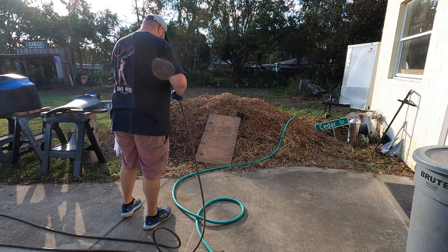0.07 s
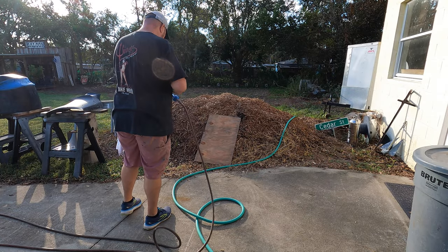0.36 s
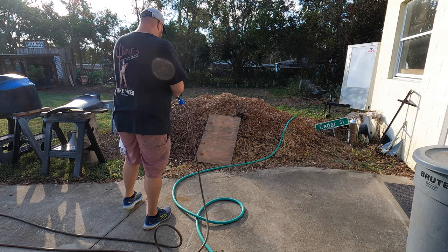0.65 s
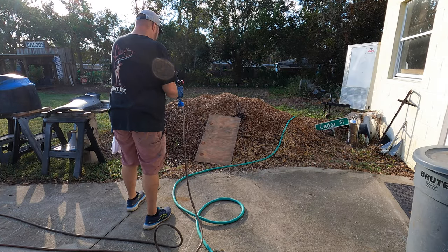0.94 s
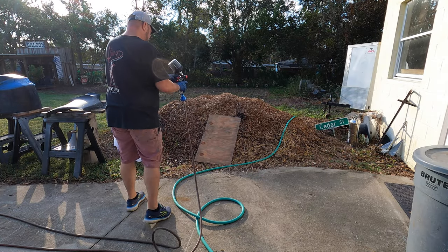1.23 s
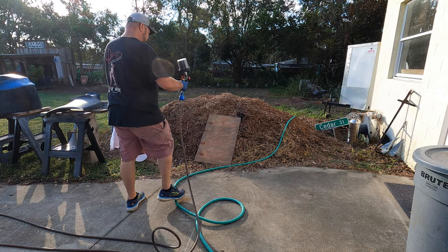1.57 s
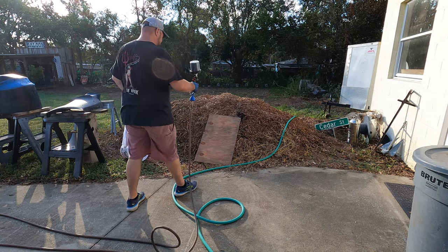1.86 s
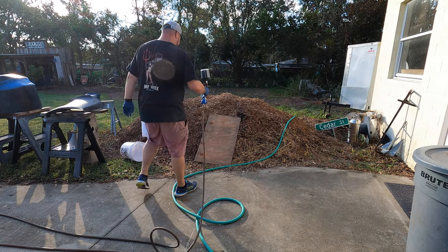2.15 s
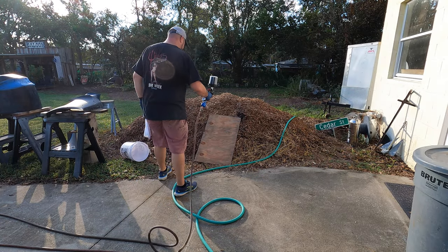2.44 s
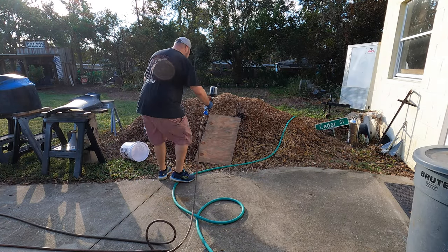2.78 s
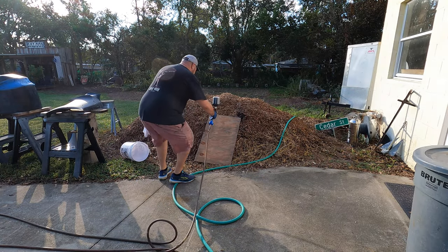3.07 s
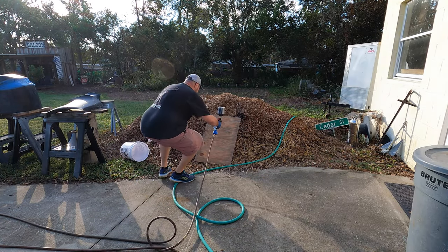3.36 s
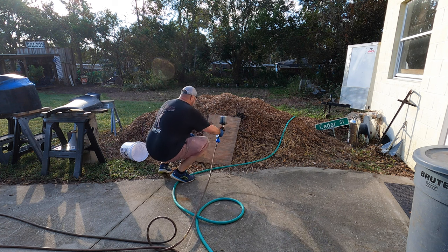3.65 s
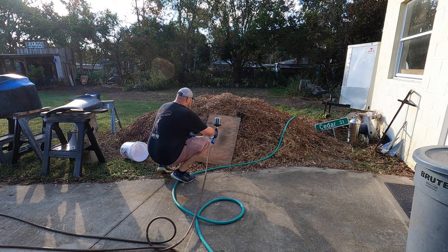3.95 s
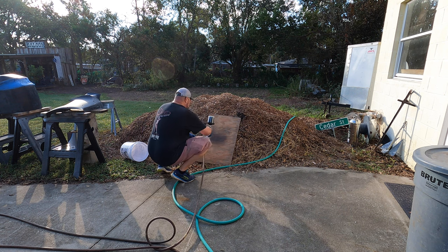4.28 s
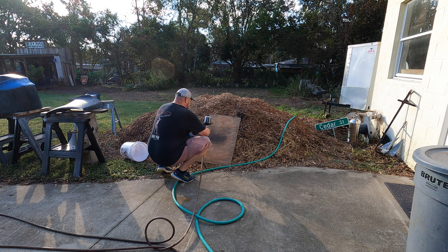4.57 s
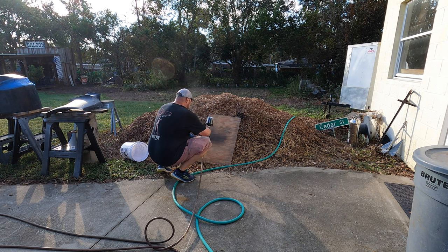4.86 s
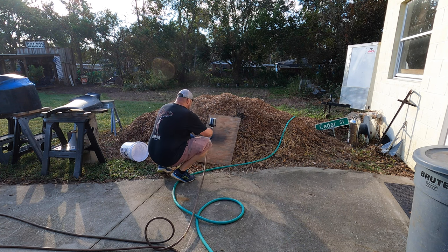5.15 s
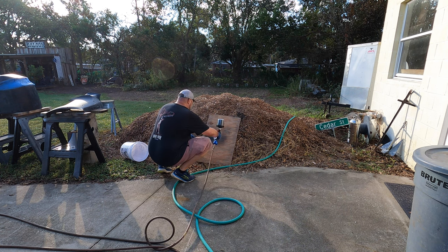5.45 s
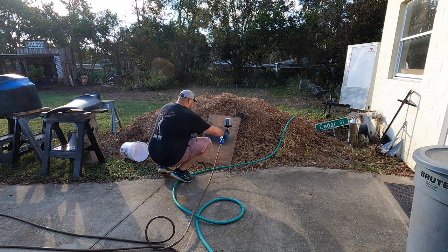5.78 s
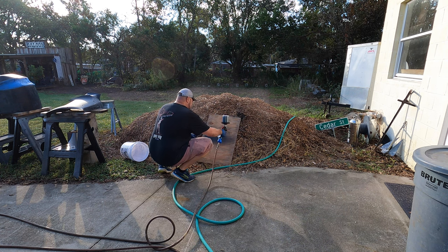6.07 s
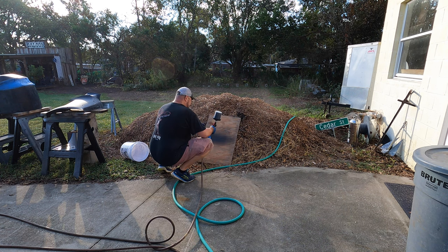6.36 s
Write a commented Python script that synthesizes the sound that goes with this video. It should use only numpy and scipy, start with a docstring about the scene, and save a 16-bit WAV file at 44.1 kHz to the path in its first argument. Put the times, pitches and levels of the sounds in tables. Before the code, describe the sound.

A compressed-air paint gun sprays two long hissing bursts outdoors after a few scuffing footsteps, over a low compressor hum.

```python
"""A back yard, on a stereo pair close to a man with a compressed-air paint gun.
A compressor hums underneath and air leaks faintly from the gun. There are scuffs, ticks and hollow knocks
as he steps from a concrete patio onto dry leaves and crouches. He fires twice at a board: each pull starts
as bright dry air with a kick, then dulls as paint flows and turns hollow as the nozzle nears the board.
The first paint comes with a short crack and splutter. At the end the leak plays faintly on the board."""
import sys
import numpy as np
from scipy import signal
from scipy.fft import rfft, irfft, next_fast_len
from scipy.io import wavfile

SR = 44100
rng = np.random.default_rng(int(sys.argv[2]) if len(sys.argv) > 2 else 0)


def wrap_up_sound(samples):
    """Save the sound to the file named by the first command line argument, as 16-bit audio."""
    columns = np.atleast_2d(samples).T
    # keep every value between -1 and 1, then stretch to whole-number steps
    tamed = np.clip(columns, -1, 1)
    steps = np.round(tamed * 32767).astype(np.int16)
    wavfile.write(sys.argv[1], SR, steps)


N = 287523
T = np.arange(N) / SR
CUTOFF_HZ = 15400

# trigger pulls: air_open_s, air_shut_s, paint_half_open_s, paint_ramp_s, primed_paint_share
PULLS = [(3.039, 4.444, 3.777, 0.097, .08), (4.7552, 5.936, 4.83, 0.014, 0.03)]
# the bed of the yard: time_s, rumble_db, wash_db, leak_db
YARD_LEVEL = [(0, -45, -50.5, -58), (1.7, -42, -52.5, -63.5), (2.7, -42, -49, -64),
              (3.2, -44.5, -59, -65.5), (5.3, -47, -54.5, -69), (6.52, -43, -56, -67.5)]


def from_db(db):
    """Decibels to gain."""
    return 10 ** (np.asarray(db) / 20)


def rms_one(x):
    """Scale to rms 1."""
    return x / np.sqrt(np.mean(x ** 2) + 1e-20)


def bell(x, centre, width):
    """A Gaussian of height 1; width is its standard deviation."""
    return np.exp(-((x - centre) / width) ** 2 / 2)


def in_time(rows):
    """Each column of a curve table at every sample."""
    time_s, *columns = np.transpose(rows)
    return [np.interp(T, time_s, column) for column in columns]


def over_bins(points, size):
    """A table of freq_hz, value on the bins of an FFT, joined on a log axis."""
    hz, value = np.transpose(points)
    return np.interp(np.log(np.arange(size // 2 + 1) * SR / size + 1e-3), np.log(hz), value)


def coloured(x, spectrum):
    """Equalise by a table of freq_hz, gain_db."""
    size = next_fast_len(2 * (x.shape[-1] // 2 + 1), True)
    return irfft(rfft(x, size) * from_db(over_bins(spectrum, size)), size)[..., :x.shape[-1]]


def air_noise(spectrum, likeness):
    """Stereo noise of a given colour and left-right likeness; rms 1."""
    size = next_fast_len(N, True)
    mid, side = rfft(rng.standard_normal((2, size)))
    alike = np.clip(over_bins(likeness, size), -1, 1)
    pair = np.sqrt(1 + alike) * mid + np.sqrt(1 - alike) * side * [[1], [-1]]
    return rms_one(irfft(pair * from_db(over_bins(spectrum, size)), size)[:, :N])


def drift(rate_hz, hop=40):
    """A slow random wander with rms about 1."""
    pole = np.exp(-2 * np.pi * hop * rate_hz / SR)
    slow = signal.lfilter([1], [1, -2 * pole, pole * pole], rng.standard_normal(N // hop + 2002))[2000:]
    return np.interp(np.arange(N) / hop, np.arange(len(slow)), rms_one(slow))


def low_pass(x, hz, order):
    """Butterworth low-pass."""
    return signal.sosfilt(signal.butter(order, hz, fs=SR, output="sos"), x)


def broad_band(x, hz, spread):
    """A band with gentle skirts about a centre."""
    edges_hz = [hz / spread, min(hz * spread, CUTOFF_HZ)]
    return signal.sosfilt(signal.butter(1, edges_hz, "band", fs=SR, output="sos"), x)


def resonance(x, hz, width_hz):
    """Two-pole band-pass with gain 1 on top."""
    r = np.exp(-np.pi * width_hz / SR)
    feedback = [1, -2 * r * np.cos(2 * np.pi * hz / SR), r * r]
    return signal.lfilter(np.array([1, 0, -1]) * (1 - r * r) / 2, feedback, x)


def compressor(buzz_db=-3, throb_trim_db=-2.5, fading_db=-50, fading_hz=2.7):
    """Motor hum and pump throb at unrelated speeds, each partial wavering by itself."""
    speed = [(0, 74.95, 95.78), (4, 73.94, 94.5), (6.52, 74.1, 94.02)]  # sags as the tank fills: time_s, motor_hz, pump_hz
    throb = [(0.0, -46), (0.11, -34.5), (0.51, -40.5), (1.03, -30.5), (1.92, -37), (2.07, -58),
             (2.34, -31.5), (2.52, -51), (2.61, -33.5), (2.83, -59), (2.89, -36), (3.1, -61), (3.3, -32),
             (3.47, -63), (3.79, -44), (5.7, -48.5), (5.94, -38), (6.52, -39)]  # pump fundamental before its trim: time_s, level_db
    hum = [(0, -49), (1.05, -47.5), (2.9, -59.5), (5.3, -57), (6.52, -49.5)]  # motor hum: time_s, level_db
    motor_orders = [(.5, -3), (1, 0.5), (1.75, 2.5), (3, -4), (4, -1.2), (6, -15.5), (7, -17.5), (8, -11.5),
                    (9, -17.5), (10, -23.5), (11, -34), (12, -26.5), (13, -22.5)]  # partials against the hum level: multiple, gain_db
    pump_orders = [(.5, -58.5), (2, -62), (2.75, -65), (4, -62.5), (7, -68)]  # other pump partials: multiple, level_db
    motor_turns, pump_turns = np.cumsum(in_time(speed), axis=1) / SR
    (throb_db,), (hum_db,) = in_time(throb), in_time(hum)
    rumble_db = in_time(YARD_LEVEL)[0]

    def partial(turns, level_db, wobble_rad, waver_db=1.5):
        phase = 2 * np.pi * (turns + rng.random()) + wobble_rad * drift(4.8)
        return np.sqrt(2) * from_db(level_db + waver_db * drift(1.5)) * np.sin(phase)

    motor = sum(partial(k * motor_turns, hum_db + db, wobble_rad=0.2) for k, db in motor_orders)
    motor += partial(2 * motor_turns, rumble_db + buzz_db, wobble_rad=0.52)  # follows the rumble
    pump = sum(partial(k * pump_turns, db, wobble_rad=0.11) for k, db in pump_orders)
    pump += partial(pump_turns, throb_db + throb_trim_db, wobble_rad=0.26, waver_db=2.5)
    # an unsteady part beats against the throb
    angle = 2 * np.pi * pump_turns
    fading = drift(fading_hz) * np.cos(angle) + drift(fading_hz) * np.sin(angle)
    return motor + pump + from_db(fading_db) * fading


def background():
    """Machine rumble, the distant wash of the neighbourhood and air leaking from the gun."""
    # the colour of each noise: freq_hz, gain_db
    rumble = [(15, -37), (30, -9.5), (60, 2), (125, -2), (190, -3), (270, -9.5), (340, -15.5), (450, -30),
              (800, -66)]
    wash = [(200, -1.5), (380, 5), (500, -4.5), (660, 1.5), (850, -6.5), (1250, -8.5), (1800, -13.5),
            (2700, -20), (4000, -31), (9000, -51)]
    leak = [(1500, -2.5), (3600, -6.5), (5200, -0.1), (7200, 0.5), (8300, -6.5), (11000, -6), (12500, -9.5),
            (14000, -17), (15500, -34)]
    likeness = [(100, 0.99), (200, 0.95), (450, 0.55), (1000, 0.33), (3000, 0.41), (10000, 0.48)]  # left against right: freq_hz, correlation
    layers = zip(in_time(YARD_LEVEL), (rumble, wash, leak))
    return sum(from_db(db) * air_noise(spectrum, likeness) for db, spectrum in layers)


def scuffs(grains_per_s=1200, grain_db=4.0, rub=0.37, spread=1.54, top_hz=7000):
    """Dense grains crunch over the smooth rub of each scuff; the last is a splutter as the paint starts."""
    strokes = [(0.096, 0.067, -52, 4100), (.55, 0.61, -78, 2500), (0.757, 0.012, -60, 3000),
               (0.834, 0.022, -66, 2300), (1.066, 0.024, -62, 4500), (1.395, 0.023, -59, 4000),
               (1.86, 0.015, -49.5, 900), (2.065, 0.056, -59, 2260), (2.465, 0.027, -54, 1670),
               (2.588, 0.04, -54, 800), (2.635, 0.011, -44.5, 1840), (2.668, 0.015, -48.5, 2600),
               (2.846, 0.0091, -53, 1270), (2.94, 0.12, -59, 1240), (3.745, 0.0072, -38, 1640)]  # middle_s, half_length_s, level_db, centre_hz
    sizes = from_db(grain_db * np.minimum(rng.exponential(1, N), 4)) * rng.standard_normal(N)
    grains = sizes * (rng.random(N) < grains_per_s / SR)
    grit = low_pass(grains + rub * rng.standard_normal(N), top_hz, order=3)
    return sum(from_db(db) * bell(T, middle_s, half_s) * rms_one(broad_band(grit, hz, spread))
               for middle_s, half_s, db, hz in strokes)


def struck(blows, modes, crack_db, crack_s=0.0029, crack_hz=7000):
    """Each blow is a short crack and sets the object's modes ringing."""
    out, age = np.zeros(N + SR), T[:SR // 4]
    ring = sum((-1) ** k * from_db(db - 60 * age / t60_s) * np.sin(2 * np.pi * hz * age)
               for k, (hz, db, t60_s) in enumerate(modes))
    for start_s, level_db in blows:
        crack = from_db(crack_db) * np.exp(-age / crack_s) * rng.standard_normal(len(age))
        blow = ring + low_pass(crack, crack_hz, order=2)
        at = round(start_s * SR)
        out[at:at + len(age)] += from_db(level_db) * blow / np.abs(blow).max()
    return out[:N]


def gun_clicks():
    """The gun clicks in his hands."""
    clicks = [(.7355, -35), (.7392, -33.5), (.8165, -46)]  # start_s, level_db
    modes = [(2305, 0, 0.039), (2600, 0, 0.023), (3630, -1, 0.036), (4000, -5, .03)]  # the gun's short ring: pitch_hz, gain_db, t60_s
    return struck(clicks, modes, crack_db=5)


def ticks(rattle_s=0.0011, rattle_db=-24, spread=2.17, ring_db=1, ring_width_hz=420):
    """Each tick is one dry snap and a short rattle, in a broad band that rings briefly at its centre."""
    snaps = [(1.3975, -31, 3400), (2.1065, -36, 4200), (2.1462, -31.5, 4400), (2.332, -41, 1900),
             (2.4655, -37, 4200), (2.6115, -39, 3000), (2.6285, -28, 3300), (2.6365, -30, 3800),
             (2.6555, -33, 4000), (2.6618, -24, 2300), (2.808, -39, 2500), (2.831, -34.5, 1600)]  # grit and twigs: start_s, level_db, centre_hz
    out, age = np.zeros(N), T[:SR // 12]
    for start_s, level_db, hz in snaps:
        rattle = from_db(rattle_db) * np.exp(-age / rattle_s) * rng.standard_normal(len(age))
        snap = (age == 0) + rattle
        tick = broad_band(broad_band(snap, hz, spread), hz, spread)
        tick += from_db(ring_db) * resonance(tick, hz, ring_width_hz)
        at = round(start_s * SR)
        out[at:at + len(age)] += from_db(level_db) * tick / np.abs(tick).max()
    return out


def knocks():
    """Two hollow knocks, and later a short crack and splutter as the paint starts."""
    blows = [(1.8487, -31), (1.8644, -38), (3.6305, -29.5), (3.7485, -23.5)]  # start_s, level_db
    modes = [(760, -15, 0.021), (1060, -4, 0.022), (1370, -6, 0.03), (1670, 0, 0.02), (1900, -1, 0.02)]  # the hollow ring: pitch_hz, gain_db, t60_s
    return struck(blows, modes, crack_db=-1.0)


def hollow_rub(at_s=2.6, half_s=0.073, hz=440, width_hz=60, level_db=-50):
    """A brief hollow note goes with the step off the patio."""
    note = resonance(resonance(rng.standard_normal(N), hz, width_hz), hz, width_hz)
    return from_db(level_db) * np.exp(-((T - at_s) / half_s) ** 2) * rms_one(note)


def valve(open_s=0.0019, shut_s=0.0052, kick_s=0.027, kick_db=6):
    """The air valve snaps open, dumps the pressure stored in the hose and closes a little more slowly."""
    flow = np.zeros(N)
    for start_s, stop_s, *_ in PULLS:
        opening = (1 + np.tanh((T - start_s) / (2 * open_s))) / 2
        closing = (1 - np.tanh((T - stop_s) / (2 * shut_s))) / 2
        kick = np.exp(-(np.maximum(T - start_s, 0) / kick_s) ** 2)
        flow += opening * closing * from_db(kick_db * kick)
    return flow


def paint_flow(clear_s=0.035, full_share=0.96):
    """Paint share, 0-1: what sits in the nozzle spits out, then the trigger's second stage feeds more."""
    share = np.zeros(N)
    for start_s, _, paint_s, ramp_s, primed in PULLS:
        needle = (1 + np.tanh((T - paint_s) / ramp_s)) / 2
        spit = primed * np.exp(-np.maximum(T - start_s, 0) / clear_s)
        share = np.where(T >= start_s, spit + full_share * needle, share)
    return np.clip(share, 0, 1)


def gap_tone(hz, width_hz, side_db=-17):
    """Turbulence rings in the gap between nozzle and board, in a broad band centred on the curve hz."""
    size = next_fast_len(N)
    offset_hz = np.fft.fftfreq(size, 1 / SR)
    turbulence = rfft(rng.standard_normal((2, 2 * size)))[:, :size]
    flutter = np.fft.ifft(turbulence / (1 + (offset_hz / width_hz) ** 2))[:, :N]
    carrier = np.exp(2j * np.pi * np.cumsum(hz) / SR)
    mid, side = rms_one(np.real(flutter * carrier))
    return mid + from_db(side_db) * side * [[1], [-1]]


def board_echo(x):
    """A mostly inverted echo off the board slides as the gun travels, combing the jet."""
    path = [(3.9, 0.58, -0.0046), (4.3, 0.47, -0.052), (4.8, 0.7, -0.044), (5.5, 0.78, -0.0071),
            (5.75, 0.806, -0.16), (5.93, .85, 0.0059)]  # the reflection: time_s, lag_ms, strength
    lag_ms, strength = in_time(path)
    late = np.array([np.interp(T - lag_ms / 1000, T, channel) for channel in x])
    return (x + strength * late) / np.sqrt(1 + strength ** 2)


def hollowed(x, width_hz=200):
    """A reflection off arm and paint cup thins one band of the jet, which sways with his hand."""
    notch = [(3.7, 6000, -0.5), (4.0, 5980, 2), (4.44, 5860, 1), (4.9, 4650, 1), (5.2, 4080, 4),
             (5.55, 4090, 0.5), (5.9, 3830, 0)]  # time_s, centre_hz, depth_db
    time_s, centre_hz, depth_db = np.transpose(notch)
    bin_hz, frame_s, frames = signal.stft(x, SR, nperseg=512)
    band = bell(bin_hz[:, None], np.interp(frame_s, time_s, centre_hz), width_hz)
    dip_db = np.interp(frame_s, time_s, depth_db) * band
    return signal.istft(frames * from_db(-dip_db), SR)[1][:, :N]


def spray(roar_db=-13, roar_range_db=25.5, ring_db=-13.5, ring_range_db=12):
    """A turbulent jet, dulled by paint; the board's roar and the gap's ring grow as the nozzle nears."""
    jet_level = [
        [(3.1, -25.5), (3.356, -25.5), (4.42, -31.5)],
        [(4.82, -30.5), (5.214, -32.5), (5.742, -29), (5.92, -31)],
    ]  # one table a pull: time_s, level_db
    aim = [(3.04, 0.14, 3697, 4650, 5230, 6700), (3.6, 0.69, 3555, 4500, 5310, 6550),
           (3.9, 0.64, 3142, 3850, 5460, 6650), (4.3, 0.83, 3200, 4100, 5270, 7040),
           (4.76, 0.25, 3397, 4000, 5310, 6560), (4.9, 0.82, 3422, 4050, 5350, 6560),
           (5.25, 0.92, 3590, 4700, 5580, 6350), (5.53, 0.74, 3520, 4690, 5200, 6780),
           (5.72, 0.78, 3340, 4400, 5344, 6720), (5.93, 0.53, 3030, 4320, 5290, 6750)]  # nozzle to board: time_s, nearness (0-1), resonance_hz for four gap resonances
    gap_tones = [(0.5, 200), (-2, 270), (3, 240), (0.5, 500)]  # those resonances: gain_db, width_hz
    # the gap rings out as the gun sweeps across: middle_s, half_length_s, gain_db for each resonance
    sweeps = [(4.2, 0.18, 1, 3, 4.5, 7), (5.55, 0.073, 7.1, 4, -5, -7), (5.77, 0.072, 6.7, 7, 6.5, 4)]
    # colours of dry air, paint-laden air and its roar on the board: freq_hz, gain_db
    dry_jet = [(300, -22), (700, -23), (1200, -14.5), (2400, -9.5), (3300, -6), (5300, -1.5), (6900, 1.5),
               (8000, -3.5), (8600, -3.5), (10800, -3.7), (12200, -8), (14000, -16), (15500, -31)]
    wet_jet = [(500, -22.5), (1200, -10), (1800, -6), (2600, -4), (3700, 0.5), (4350, -1), (6000, 1),
               (7000, 2), (8150, -4.5), (9300, -6), (10500, -4), (11400, -9), (12200, -10.5),
               (14000, -17.5), (15500, -58)]
    impact_roar = [(250, -31), (520, -12.5), (900, 1.5), (1200, -3), (2000, -11), (5000, -38)]
    likeness = [(300, 0.21), (1200, 0.95), (3000, 0.88), (12000, 0.53)]  # left against right: freq_hz, correlation
    level_db, = in_time(np.vstack(jet_level))
    nearness, *gap_hz = in_time(aim)
    paint = paint_flow()
    swell_db = sum(np.outer(gains_db, bell(T, at_s, half_s)) for at_s, half_s, *gains_db in sweeps)
    tone_db, widths_hz = np.transpose(gap_tones)
    rings = from_db(ring_db - ring_range_db * (1 - nearness) + swell_db + tone_db[:, None])
    jet = np.sqrt(1 - paint) * air_noise(dry_jet, likeness)
    jet += np.sqrt(paint) * air_noise(wet_jet, likeness)
    jet += paint * from_db(roar_db - roar_range_db * (1 - nearness)) * air_noise(impact_roar, likeness)
    jet += sum(ring * gap_tone(hz, width_hz) for ring, hz, width_hz in zip(rings, gap_hz, widths_hz))
    # the resonances share out the jet's power without adding to it
    jet /= np.sqrt(1 + np.sum(rings ** 2, axis=0))
    return scattered(hollowed(board_echo(jet))) * valve() * from_db(level_db)


def trigger_stop():
    """On the second pull the trigger hits its stop and the metal of the gun rings."""
    hit = [(4.7598, -17.5)]  # start_s, level_db
    modes = [(6560, 2, 0.19), (10300, -9, .25), (11800, -2, .25)]  # the metal: pitch_hz, gain_db, t60_s
    return struck(hit, modes, crack_db=19, crack_s=0.00028)


def leak_on_board(swell_s=0.3):
    """With the trigger let go, the leak swells into a faint hollow hiss against the board."""
    tones = [(1375, 210, -71), (4660, 520, -74)]  # bands of the hiss: centre_hz, width_hz, level_db
    swell = np.clip((T - PULLS[-1][1]) / swell_s, 0, 1)
    return swell * sum(from_db(db) * gap_tone(np.full(N, hz), width_hz) for hz, width_hz, db in tones)


def scattered(x, scatter_db=-14, first_s=0.00443, t60_s=0.05):
    """Ground, body and leaf pile return many weak early echoes that finely ripple the spectrum."""
    age = T[:SR // 16]
    echoes = rng.standard_normal(len(age)) * from_db(-60 * age / t60_s) * (age > first_s)
    echoes *= from_db(scatter_db) / np.sqrt(np.sum(echoes ** 2))
    returned = signal.fftconvolve(x, echoes[None], axes=1)[:, :N]
    return (x + returned) / np.sqrt(1 + from_db(scatter_db) ** 2)


def yard(x, wet_db=-16.0, first_s=0.0062, t60_s=0.73):
    """Wall, fence and trees scatter a short diffuse tail, different at each microphone."""
    tail_colour = [(300, -4), (1500, 5), (3000, -4), (4500, 2.5), (7000, -0.5), (10000, -2), (15000, -7)]  # freq_hz, gain_db
    age = T[:SR]
    tail = rng.standard_normal((2, SR)) * from_db(-60 * age / t60_s) * np.clip(age / first_s - 1, 0, 1)
    tail = coloured(tail / np.sqrt(np.sum(tail ** 2) / 2), tail_colour)
    return from_db(wet_db) * signal.fftconvolve(x, tail, axes=1)[:, :N]


def scene():
    """Gun and footwork close to the microphones, with the yard and the compressor's hum behind."""
    # clicks, ticks and knocks with their highest treble rolled off
    contacts = low_pass(gun_clicks() + ticks() + knocks(), hz=11600, order=4)
    close = scuffs() + scattered(contacts[None]) + hollow_rub() + spray() + trigger_stop()
    return compressor() + background() + close + yard(close) + leak_on_board()


def record(dry):
    """The close pair hears width unevenly, almost none near 5.3 and 10.6 kHz; the top is cut steeply."""
    pair_width = [(2400, -2), (3700, 1.5), (4500, -6), (5300, -26), (6300, -18), (7400, -1), (9200, -0.5),
                  (10600, -29), (12300, 2), (14500, 8)]  # the pair's side response: freq_hz, gain_db
    mid = (dry[0] + dry[1]) / 2
    side = coloured((dry[0] - dry[1]) / 2, pair_width)
    top_cut = signal.ellip(12, 0.1, 90, CUTOFF_HZ, fs=SR, output="sos")
    return signal.sosfilt(top_cut, mid + side * [[1], [-1]])


dry = scene()
out = record(dry)
wrap_up_sound(out)
```